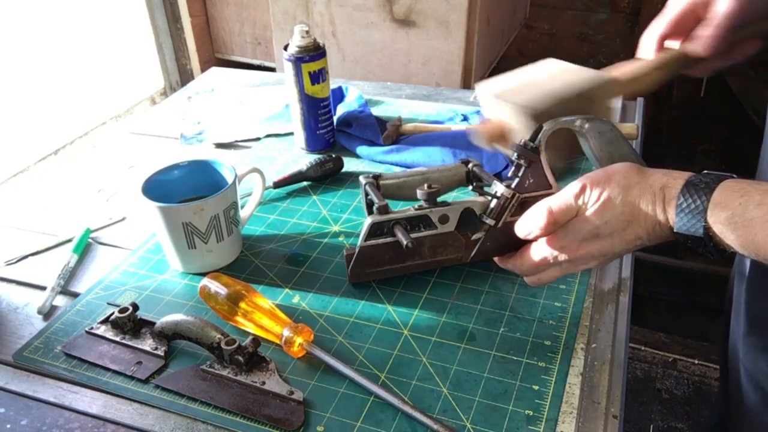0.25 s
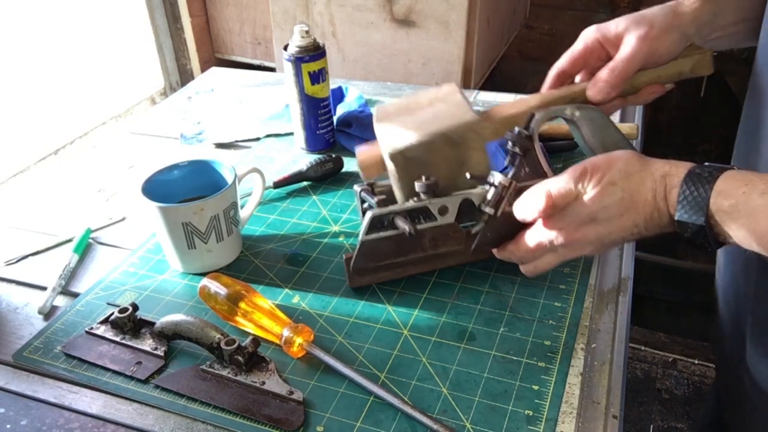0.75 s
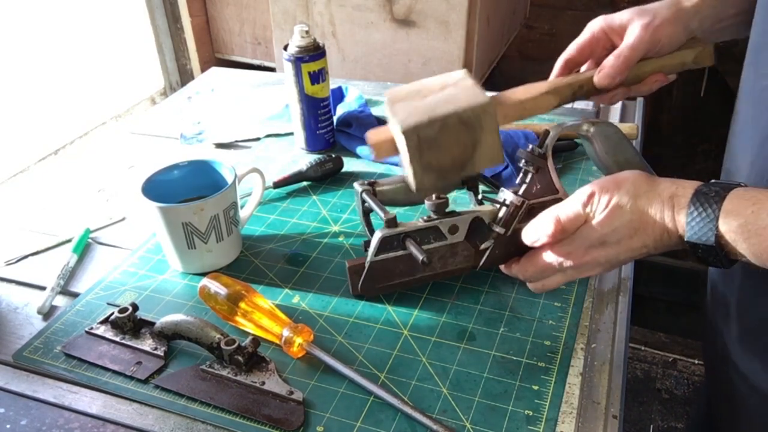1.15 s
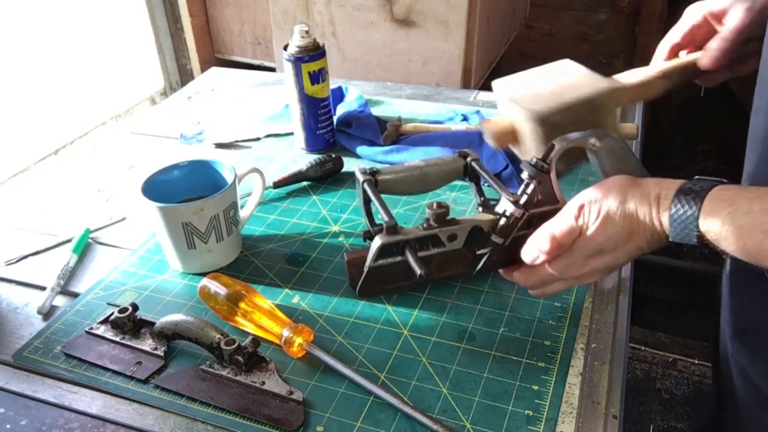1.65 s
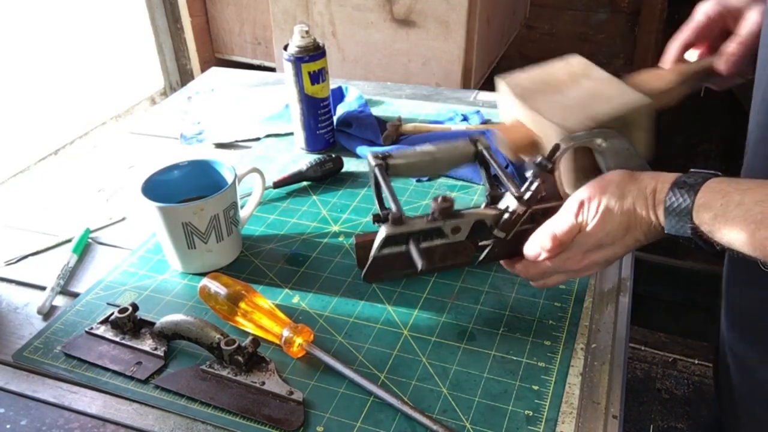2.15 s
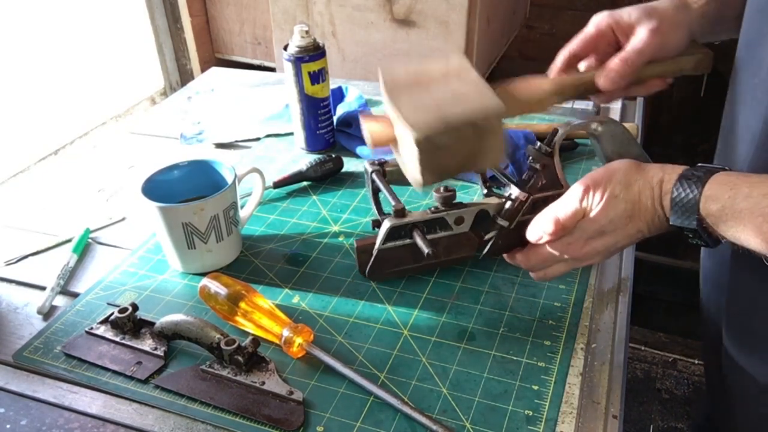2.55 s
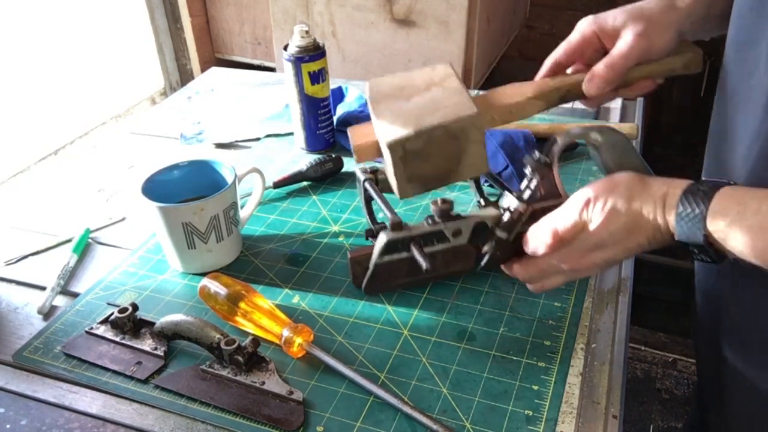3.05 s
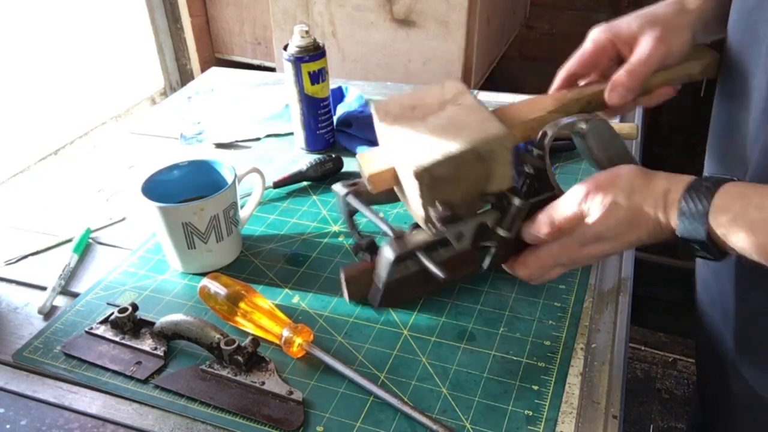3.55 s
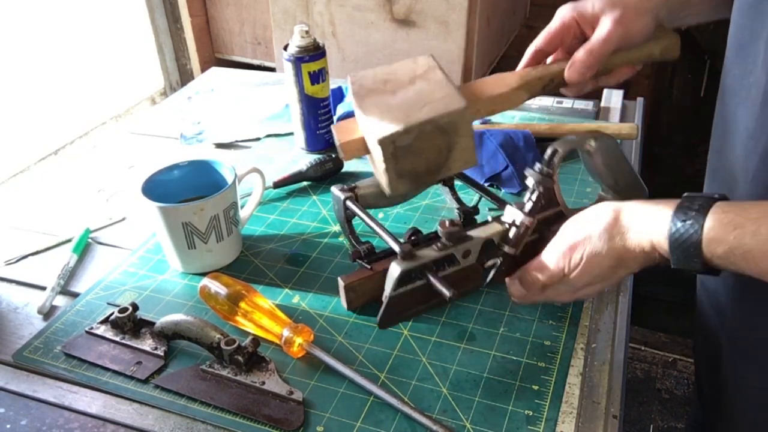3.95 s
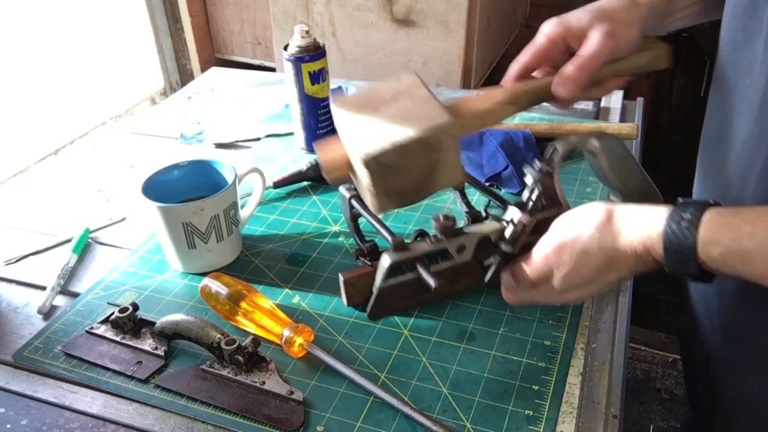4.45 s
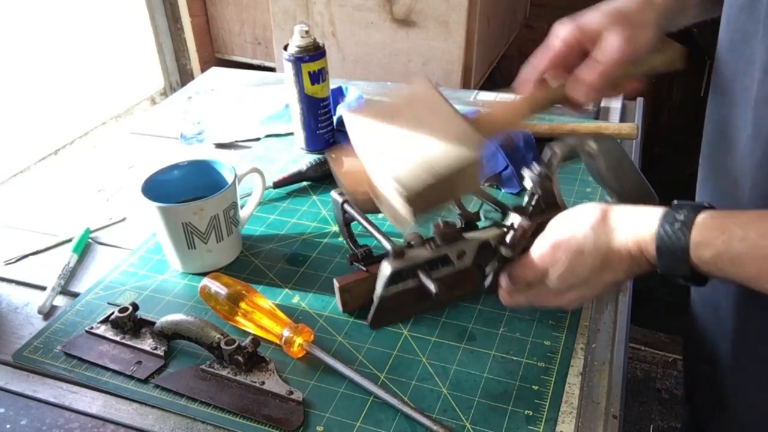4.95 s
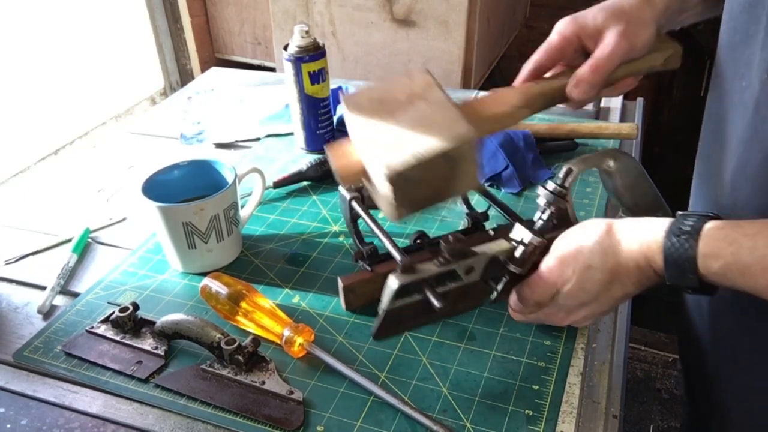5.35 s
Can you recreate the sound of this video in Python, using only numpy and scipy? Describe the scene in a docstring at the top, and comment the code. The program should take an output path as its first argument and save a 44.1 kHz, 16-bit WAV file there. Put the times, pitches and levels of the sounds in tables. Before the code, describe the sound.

In a small, quiet workshop a wooden mallet raps a metal hand plane held on a matted bench. First blows are irregular, with pauses filled by soft knocks and ticks of loose fittings; from about 2.5 seconds they become regular, four or five a second, and louder. Each is a short, dry clank with a woody thump. Close mono microphone, brief room reflections, loudest peaks flattened.

```python
"""Small workshop: a wooden mallet knocks a stuck part out of a metal hand plane on a bench.
Each blow is shaped noise plus damped sines: casting ring, bench thump, wooden fence clop.
Between blows the plane rocks and knocks on the mat, fittings tick in noise bursts, a hand rubs.
Loose steel hums on faintly in long sines; the noise decays include a brief room answer.
A limiter flattens the loudest blows."""
import sys
import numpy as np
from scipy import signal
from scipy.fft import rfft, irfft
from scipy.io import wavfile
from scipy.ndimage import uniform_filter1d, minimum_filter1d

SR = 44100
rng = np.random.default_rng(int(sys.argv[2]) if len(sys.argv) > 2 else 0)


def wrap_up_sound(samples):
    """Save the sound to the file named by the first command line argument, as 16-bit audio."""
    columns = np.atleast_2d(samples).T
    # keep every value between -1 and 1, then stretch to whole-number steps
    tamed = np.clip(columns, -1, 1)
    steps = np.round(tamed * 32767).astype(np.int16)
    wavfile.write(sys.argv[1], SR, steps)


N = 246959
RING_N = 2 ** 15  # samples per struck sound
T = np.arange(RING_N) / SR

# mallet blows: start_s, level_db, place (rounded to 0-3), thump_db (how firmly the plane rests),
# ring_db (how loosely the casting is held)
BLOWS = [(0.1011, -21.5, 0.5, -1.5, 1), (0.584, -26.5, 0.5, 4.5, -2.5), (0.779, -26.7, 1, 9, 0),
         (0.9696, -24.5, 1, 2.5, -1.5), (1.525, -23, 0.5, -0.5, 8), (1.7942, -21.5, -0.5, 3.5, 8.5),
         (2.0574, -23.5, 0, -6.5, 8), (2.4542, -25, 1, 3.5, 0.5), (2.678, -22.7, 1, 4, 0),
         (2.892, -22.5, 1.5, 4, 3.5), (3.1, -21.5, 1, 3.5, 0), (3.308, -19.5, 2, 4, 2),
         (3.5256, -19.5, 2, 6.5, 0.5), (4.0426, -18, 2, 3, -2), (4.2761, -19.5, 3, 4.5, -2),
         (4.4892, -17.3, 3, 2, 0), (4.7252, -17, 2, 5.5, 1), (4.9682, -18, 3, 5.5, 0),
         (5.1996, -16.5, 2, 3, 0), (5.4302, -18, 2, 2.5, 1.5)]
# plane knocking on the bench: start_s, level_db, hard_db (high where iron touches),
# clop_db (high where the fence lands flat)
KNOCKS = [(0.211, -38.5, 5, -8), (0.544, -35, -2.5, 6.5), (0.714, -40, 1, 10), (0.768, -41.5, 9, 12),
          (0.924, -34.5, 2, 5), (1.637, -45, -11, 1), (2.159, -35, 1, -7.5), (2.444, -28, 3, -1),
          (2.643, -36, -3.5, 2), (2.963, -47, 12, -5), (2.988, -41, 4, 0), (3.412, -34.5, 3.5, -8),
          (3.433, -35.5, -9, -10), (3.616, -35.5, -5.5, -5.5), (3.9704, -37, -10, 6.5),
          (4.205, -48, -4.5, 11), (4.263, -25.5, 0, 0.5), (4.405, -38.5, 5, -16), (5.103, -39, 1, -3),
          (5.275, -32, -6, -3)]
# modes of plane and bench: pitch_hz, struck_0_db, struck_1_db, struck_2_db, struck_3_db,
# sole_hit_db (sole hits the bench)
MODES = [(82, -28, -22, -23, -20, -13), (113, -23, -26, -17, -21, -26), (139, -24, -26, -9, -15, -15),
         (172, -36, -32, -17, -24, -31), (222, -15, -14, -14, -17, -17), (261, -10, -10, -5, -10, -4),
         (339, -8, -7, -13, -4, -7), (386, -10, -6, -10, -6, -4), (465, -13, -14, -18, -9, -13),
         (546, -12, -10, -9, -10, -11), (672, -8, -7, -9, -9, -7), (745, -18, -11, -15, -25, -16),
         (945, -11, -6, -8, -5, -8), (1010, -20, -12, -9, -7, -10), (1110, -9, -22, -9, -12, -9),
         (1175, -9, -9, -22, -12, -12), (1330, -10, -15, -13, -14, -10), (1590, -21, -8, -12, -6, -9),
         (1660, -3, -14, -7, -9, -19), (1890, -6, -13, -8, -11, -12), (2125, -7, -9, -13, -10, -11),
         (2560, -14, -11, -11, -8, -12), (2858, -8, -14, -10, -22, -8), (3173, -8, -11, -14, -22, -21),
         (3290, -11, -8, -10, -10, -11), (4162, -10, -10, -16, -18, -17), (4312, -8, -17, -15, -28, -6),
         (6077, -12, -17, -18, -14, -14), (6533, -18, -12, -16, -17, -21)]
BLOW_DB = -20.5  # a middling blow


def undb(db):
    """Decibels to gain."""
    return 10 ** (np.asarray(db) / 20)


def across(hz, table, axis=1):
    """One table column, interpolated over log frequency."""
    table = np.asarray(table)
    return np.interp(np.log(hz + 1), np.log(table[:, 0]), table[:, axis])


def fade(t60_s):
    """Exponential decay, 60 dB down after t60_s."""
    return np.exp(-np.log(1000) * T / t60_s)


def swell(rise_s):
    """Exponential onset with time constant rise_s."""
    return 1 - np.exp(-T / rise_s)


def add(track, start_s, sound):
    """Mix a sound into the track at start_s."""
    i = int(start_s * SR)
    track[i:i + len(sound)] += sound[:N - i]


def bunching(count, uneven_db, grain_s):
    """Random gain, smoothed over grain_s, that bunches noise into short bursts."""
    size = int(grain_s * SR)
    drift = uniform_filter1d(rng.standard_normal(count), size) * np.sqrt(size)
    return undb(uneven_db * drift)


def reflections(spiky_db=3.0, grain_s=0.0007):
    """Unit-level noise whose arrivals bunch into short spikes."""
    noise = rng.standard_normal(RING_N) * bunching(RING_N, spiky_db, grain_s)
    return noise / noise.std()


def colour(hz, thump_db, ring_db, click_db, top_db=0):
    """Contact weighting in dB: bench lows, casting highs, sharpest treble."""
    return across(hz, [(50, 1.4 * thump_db), (130, thump_db), (300, thump_db), (900, 0), (1800, 0),
                       (3400, ring_db), (7000, click_db), (13000, click_db + top_db)])


def rise_time(hz, contact_s=0.00048, bench_s=0.0083, bench_hz=260):
    """Onset constant in s: metal speaks at once, the heavy bench takes longer to get going."""
    return contact_s + bench_s / (1 + (hz / bench_hz) ** 2)


def clusters(hz, spacing_hz=110, depth_db=3):
    """Each contact favours some mode clusters and misses others: dB over frequency."""
    knots = np.arange(0, SR / 2, spacing_hz)
    return depth_db * np.interp(hz, knots, rng.standard_normal(len(knots))) * hz / (hz + 600)


def crowd(response, tone, direct_db, direct_t60_s, early_db, crack_db, crack_t60_s, same=0.29):
    """Crowded weak modes as octave-band noise: crack, hard burst, near reflections, late tail."""
    # spectral density before contact weighting: pitch_hz, density_db_per_hz
    crowd_db = [(30, -66), (75, -42), (190, -43.5), (300, -37), (500, -36), (800, -30.5), (1050, -29),
                (1700, -30), (3300, -35), (5000, -42), (6300, -40), (9500, -50.5), (10700, -57.5),
                (15500, -59.5)]
    # near reflections: pitch_hz, t60_s
    early_t60 = [(80, 0.067), (250, 0.36), (1000, 0.21), (3000, 0.19), (6000, 0.15), (14000, .17)]
    # late room sound: pitch_hz, level_db, t60_s
    late_room = [(79.5, -8.5, 1), (300, -12, 0.24), (1000, -26.5, 0.38), (3000, -25.5, 0.64),
                 (7000, -33, 0.53), (13930, -31.5, .28)]
    centres_hz = 60 * 2. ** np.arange(9)

    # same objects, same room: part of the response repeats, part changes with the grip
    noise = np.sqrt(same) * response + np.sqrt(1 - same) * reflections()
    hz = np.arange(RING_N // 2 + 1) * SR / RING_N
    shape_db = across(hz, crowd_db) + colour(hz, *tone) + clusters(hz)
    spectrum = rfft(noise) * undb(shape_db) * np.sqrt(SR / 2)
    out = 0
    for centre in centres_hz:
        octave = np.clip(1 - abs(np.log2((hz + 1) / centre)), 0, 1)
        band = irfft(spectrum * octave, RING_N)
        crack = undb(crack_db) * fade(crack_t60_s) * centre / (centre + 3000)
        direct = undb(direct_db) * fade(direct_t60_s)
        early = undb(early_db) * fade(across(centre, early_t60))
        late = undb(across(centre, late_room)) * fade(across(centre, late_room, axis=2))
        envelope = np.sqrt(crack ** 2 + direct ** 2 + early ** 2 + late ** 2)
        out = out + band * envelope * swell(rise_time(centre))
    return out


def modes(tone, shape_db, detune=0.004, scatter_db=2.5):
    """Clear modes as damped sines; the grip shifts strength and pitch a little at each hit."""
    # decay, shortened by the gripping hand: pitch_hz, t60_s
    mode_t60 = [(80, 0.31), (140, 0.18), (330, 0.24), (900, 0.19), (2000, 0.17), (6500, 0.13)]
    out = 0
    draws = rng.standard_normal((len(MODES), 3))
    for (hz, *_), db, (size, shift, phase) in zip(MODES, shape_db, draws):
        wave = np.sin(2 * np.pi * (hz * (1 + detune * shift) * T + phase))
        gain = undb(db + colour(hz, *tone) + scatter_db * size)
        out = out + gain * wave * fade(across(hz, mode_t60)) * swell(rise_time(hz))
    return out


def clop(detune=0.057):
    """Hollow note of the wooden fence on the mat: damped sines, detuned at random each time."""
    # fence modes: pitch_hz, level_db, t60_s
    fence = [(600, 1.5, 0.12), (750, 4, 0.017)]
    out = 0
    for hz, db, t60_s in fence:
        pitch_hz = hz * (1 + detune * rng.standard_normal())
        out = out + undb(db) * np.sin(2 * np.pi * pitch_hz * T) * fade(t60_s)
    return out


def air():
    """Quiet of the workshop: steady shaped noise."""
    # pitch_hz, density_db_per_hz
    quiet = [(20, -104), (50, -87), (78, -84), (130, -96), (260, -96), (500, -101), (900, -100),
             (1700, -106), (2700, -108), (5000, -116), (8000, -121), (11000, -130), (16000, -138)]
    hz = np.arange(N // 2 + 1) * SR / N
    return irfft(rfft(rng.standard_normal(N)) * undb(across(hz, quiet)), N) * np.sqrt(SR / 2)


def grip(low_hz=350, high_hz=3200, uneven_db=4, slip_s=0.01):
    """Skin and sole slide in small slips: unevenly bunched band noise under bell envelopes."""
    # hand shifting its grip: middle_s, length_s (two standard deviations), level_db
    shifts = [(0.0, .05, -57), (1.3, .14, -67), (1.47, .04, -61), (4.695, .025, -52)]
    t = np.arange(N) / SR
    band = signal.butter(2, [low_hz, high_hz], "bandpass", fs=SR, output="sos")
    rub = signal.sosfilt(band, rng.standard_normal(N)) * bunching(N, uneven_db, slip_s)
    envelope = sum(undb(db) * np.exp(-(2 * (t - middle_s) / length_s) ** 2 / 2)
                   for middle_s, length_s, db in shifts)
    return rub / rub.std() * envelope


def steel(rise_s=0.006):
    """Loose steel and a thin rod: thin, lingering damped sines."""
    # blows before a pause, when the loose steel is left to sing: start_s, level_db
    sings = [(0.97, -54), (2.058, -66), (3.526, -57.5)]
    # loose steel modes: pitch_hz, level_db, t60_s
    loose_modes = [(834, -9, 3.0), (883, -13, 2.4), (1114, 0, 1.4), (1351, -14, 1.6)]
    # touches and jolts that ring the rod: start_s, level_db
    tinks = [(0.358, -69.5), (2.27, -66), (2.893, -59)]
    # rod modes: pitch_hz, level_db, t60_s
    rod_modes = [(4893, -7, .8), (5590, 0, 1.1), (8000, -5, .12), (9700, -4, .2)]

    out = np.zeros(N)
    to_zero = np.sqrt(1 - T / T[-1])
    for touches, part in ((sings, loose_modes), (tinks, rod_modes)):
        ring = sum(undb(db) * np.sin(2 * np.pi * hz * T) * fade(t60_s) for hz, db, t60_s in part)
        ring = ring * swell(rise_s) * to_zero
        for start_s, db in touches:
            add(out, start_s, undb(db) * ring)
    return out


def chatter(count=3, lag_range_s=(0.03, 0.13), offset_db=-12.5, slope_db_per_s=-170):
    """Each blow shakes ticks out of the fittings at random lags, fainter the later."""
    ticks = []
    for start_s, db, *_ in BLOWS:
        for lag_s in rng.uniform(*lag_range_s, count):
            if start_s + lag_s < N / SR:
                ticks.append((start_s + lag_s, db + offset_db + slope_db_per_s * lag_s))
    return ticks


def fittings(low_hz=2700, high_hz=6200, tick_t60_s=0.016, room_db=-16, room_t60_s=0.15):
    """Screws and rods tick in their seats: band noise bursts with a short room decay."""
    # ticks as the plane is handled: start_s, level_db
    handled = [(0.081, -48.5), (0.358, -60), (0.566, -46.5), (0.7154, -32), (1.503, -41), (1.515, -40.5),
               (1.739, -47), (2.433, -52.5), (4.703, -40)]
    rattle_db = -10.5  # tick level against knock level plus hardness
    jolted = [(start_s, db + hard_db + rattle_db) for start_s, db, hard_db, _ in KNOCKS]

    out = np.zeros(N)
    band = signal.butter(2, [low_hz, high_hz], "bandpass", fs=SR, output="sos")
    envelope = fade(tick_t60_s) + undb(room_db) * fade(room_t60_s)
    for start_s, db in handled + chatter() + jolted:
        tick = signal.sosfilt(band, rng.standard_normal(RING_N))
        add(out, start_s, undb(db) * tick / tick.std() * envelope)
    return out


def rebounds(lag_s=0.125, spread_s=0.013, middling_db=-55, db_per_db=2):
    """The plane settles in a plain knock after each blow; harder blows bounce it much higher."""
    return [(start_s + lag_s + spread_s * rng.standard_normal(),
             middling_db + db_per_db * (db - BLOW_DB), 0, 0) for start_s, db, *_ in BLOWS]


def rocking(modes_db=-1.0, top_db=-1):
    """The plane drops on the mat: gentle landings are more thump, hard contact rings more."""
    middling_db, softest_db = -40.5, -44  # below softest_db all knocks are equally dull
    base_tone_db = (11.5, -5.5, -12)  # thump, ring, click of a middling knock
    thump_db_per_db, ring_db_per_db = -0.5, 1.1

    out, response = np.zeros(N), reflections()
    shape_db = [mode[-1] for mode in MODES]
    for start_s, db, hard_db, clop_db in KNOCKS + rebounds():
        thump_db = thump_db_per_db * (max(db, softest_db) - middling_db)
        tone = np.add(base_tone_db, [thump_db, ring_db_per_db * hard_db, hard_db])
        burst = crowd(response, [*tone, top_db], direct_db=-3, direct_t60_s=0.034,
                      early_db=1, crack_db=0.5, crack_t60_s=0.008)
        knock = burst + undb(clop_db) * clop() + undb(modes_db) * modes(tone, shape_db)
        add(out, start_s, undb(db) * knock)
    return out


def mallet(modes_db=0):
    """Wood on iron: place and grip set the tone; wood gives under harder blows, so less click."""
    # 0 handle end, 1 middle, 2 middle with plane tilted, 3 tilted and pressed down:
    # click_db, top_db (extra treble), clop_db
    places = [(0.5, -1.5, -19), (0.7, 3.5, -1.5), (-0.5, 4.5, -14.5), (-0.5, 3, -8)]
    click_db_per_db = -0.5
    click_per_ring = 0.36  # dB per dB: a free casting clicks more sharply too

    out, response = np.zeros(N), reflections()
    for start_s, db, place, thump_db, ring_db in BLOWS:
        place = round(place)
        click_db, top_db, clop_db = places[place]
        click_db = click_db + click_db_per_db * (db - BLOW_DB) + click_per_ring * ring_db
        tone = [thump_db, ring_db, click_db]
        shape_db = [struck[place] for _, *struck in MODES]
        burst = crowd(response, [*tone, top_db], direct_db=8.5, direct_t60_s=0.065,
                      early_db=1.0, crack_db=1, crack_t60_s=0.023)
        blow = burst + undb(clop_db) * clop() + undb(modes_db) * modes(tone, shape_db)
        add(out, start_s, undb(db) * blow)
    return out


def scene():
    """All layers summed to one channel."""
    return (air() + grip() + steel() + fittings() + rocking() + mallet())[None]


def record(dry, hold_s=0.003, ceiling=0.69, top_hz=15900):
    """A fast limiter holds the peaks, then a steep low-pass cuts the top."""
    size = int(hold_s * SR)
    needed_gain = ceiling / np.maximum(abs(dry), ceiling)
    gain = uniform_filter1d(minimum_filter1d(needed_gain, size), size)
    low_pass = signal.ellip(8, .2, 70, top_hz, fs=SR, output="sos")
    return signal.sosfilt(low_pass, dry * gain)


dry = scene()
out = record(dry)
wrap_up_sound(out)
```